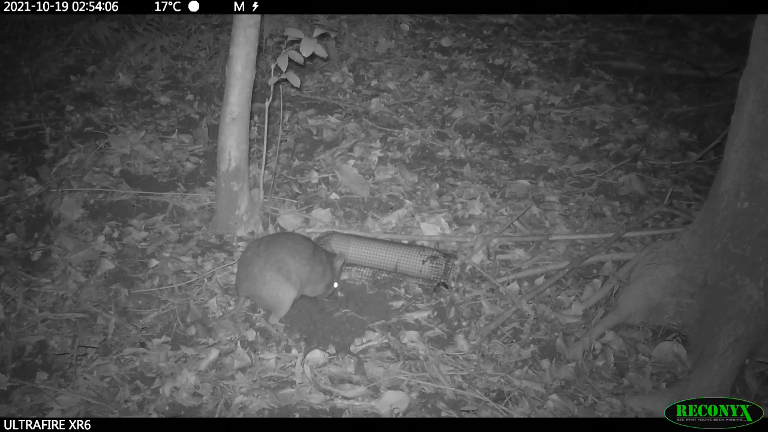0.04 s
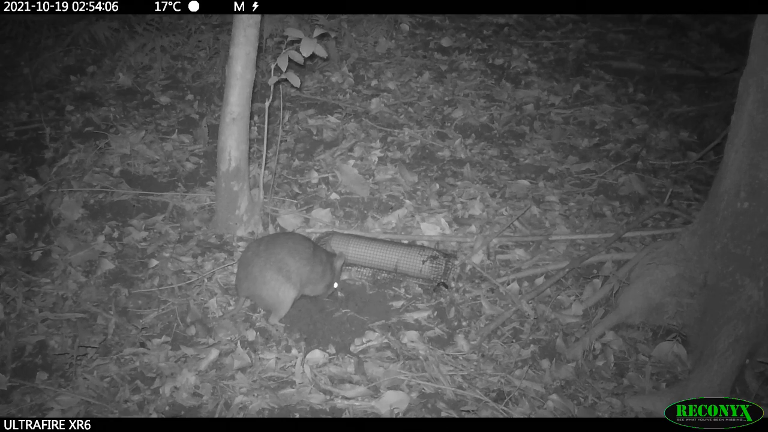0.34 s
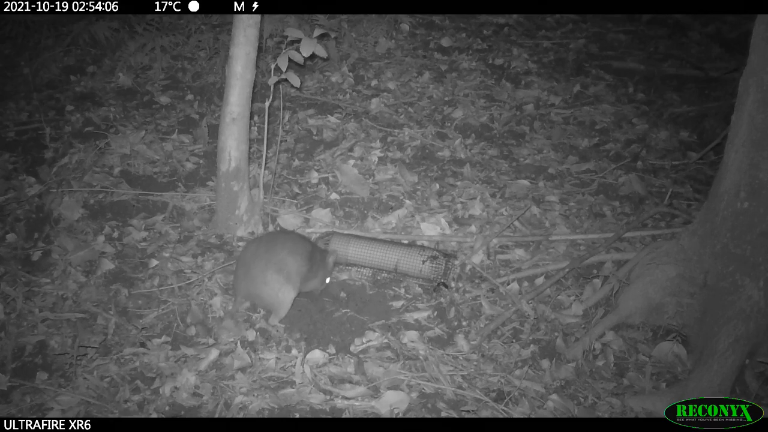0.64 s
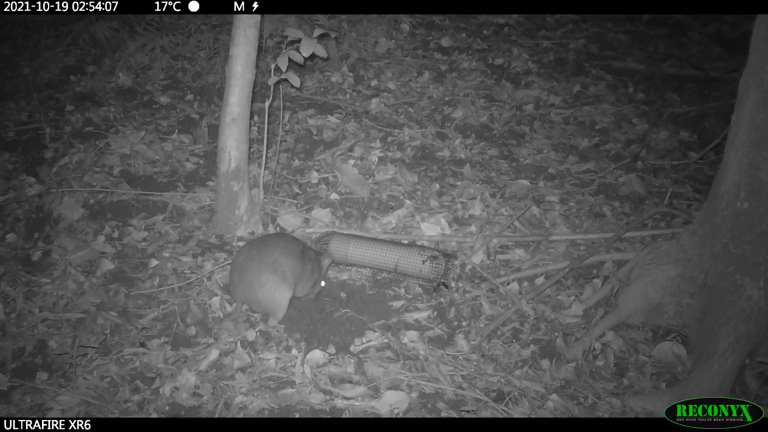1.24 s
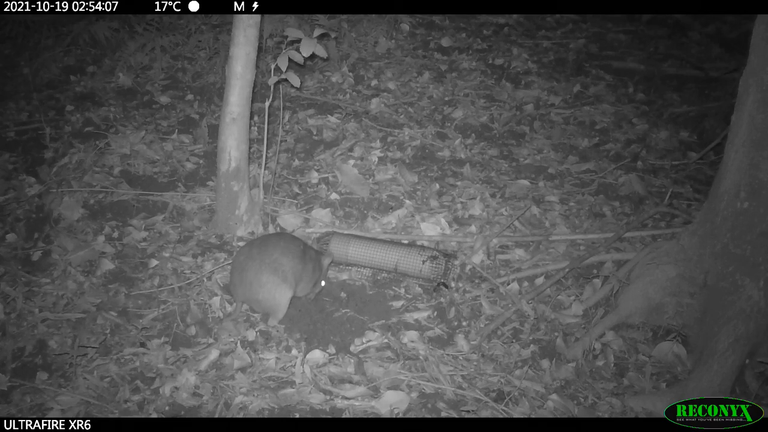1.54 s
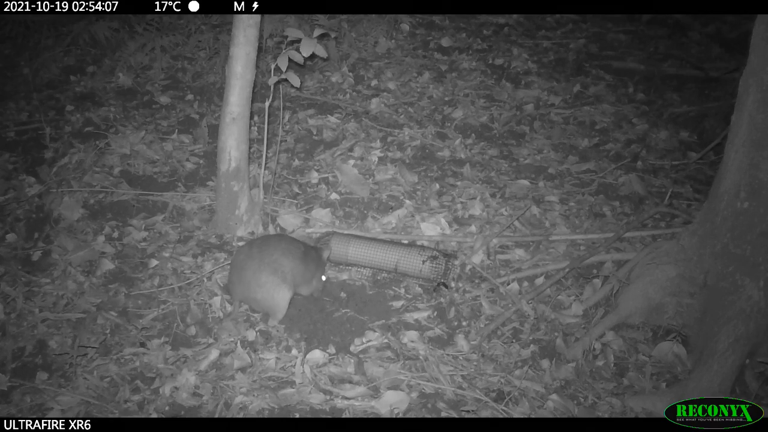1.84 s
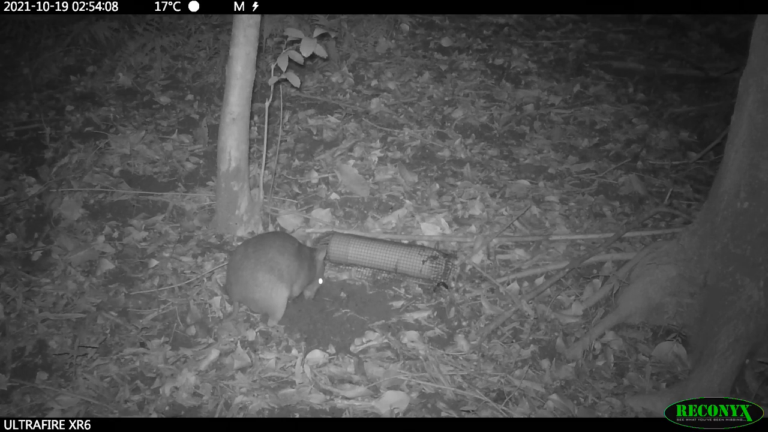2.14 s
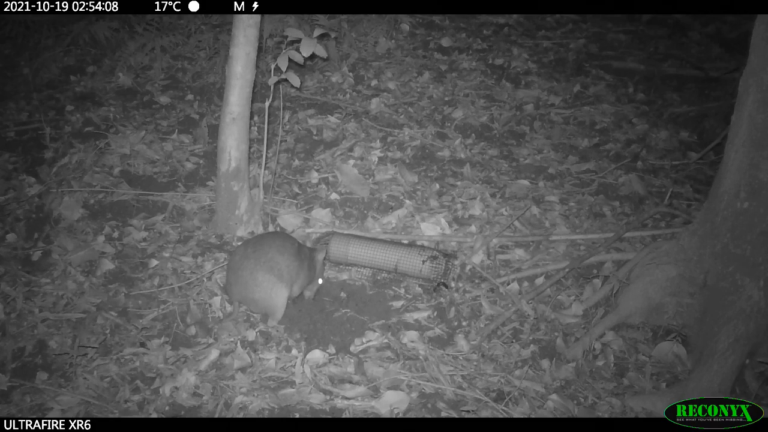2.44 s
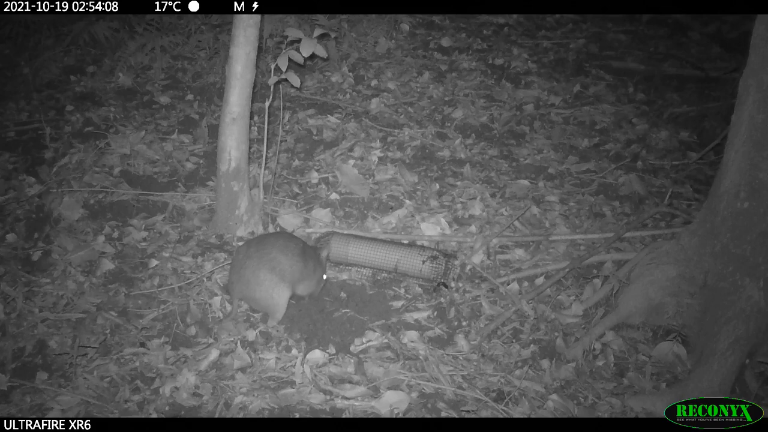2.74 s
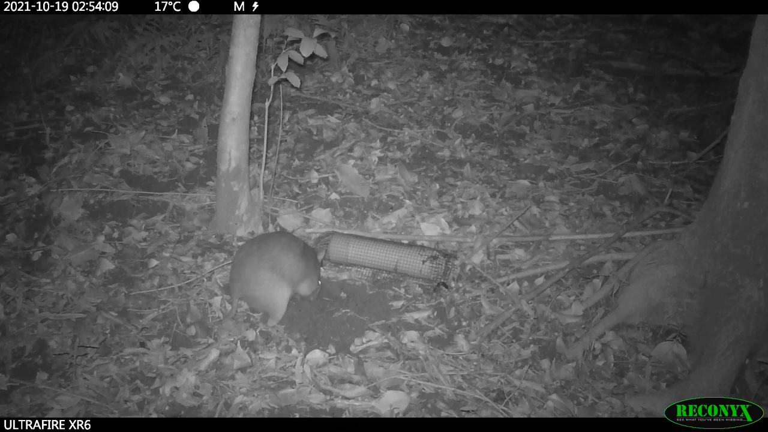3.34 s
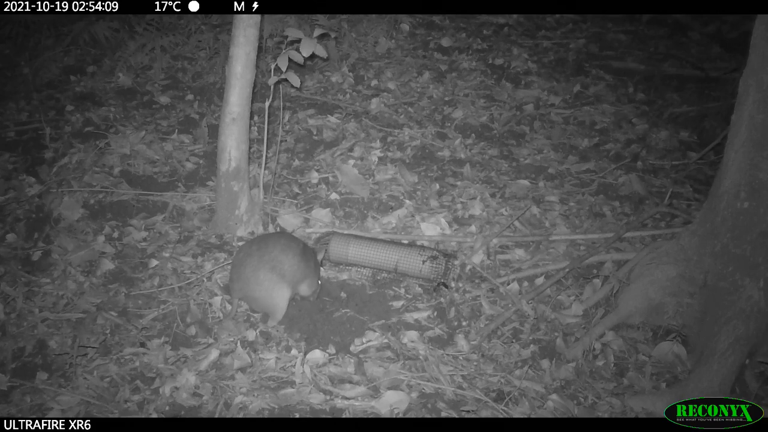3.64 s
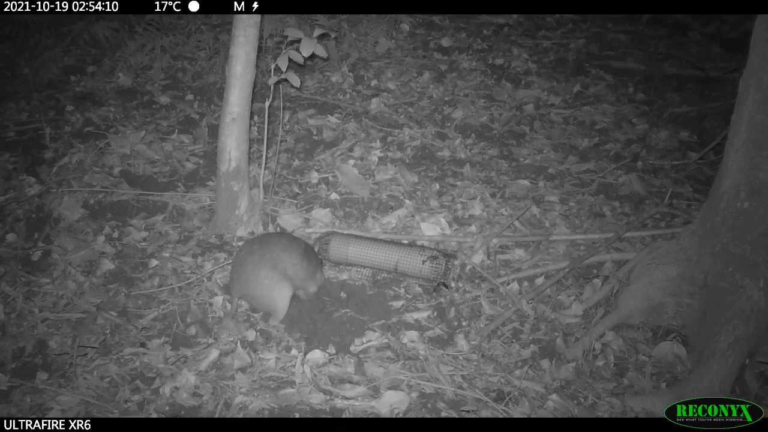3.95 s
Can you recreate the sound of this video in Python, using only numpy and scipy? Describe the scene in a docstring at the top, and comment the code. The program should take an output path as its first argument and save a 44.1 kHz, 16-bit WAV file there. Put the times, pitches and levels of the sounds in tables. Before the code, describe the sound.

Light digging and rustling in leaf litter by a small animal, amid thin night chirps.

```python
"""Thin, down-hooked chirps and very high bat-like sweeps scatter among the trunks of a forest at night.
A small animal rakes soil and dry leaves: one strong scrape, then light shuffles and twig ticks.
Each tiny fracture is an impulse that excites a damped resonance; the calls are gliding pure tones.
A closely spaced microphone pair hears the digging slightly from the left, over faint rumble and hiss."""
import sys
import numpy as np
from scipy import signal
from scipy.fft import rfft, irfft
from scipy.io import wavfile

SR = 44100
rng = np.random.default_rng(int(sys.argv[2]) if len(sys.argv) > 2 else 0)


def materialize(psi):
    """Save the field psi as 16-bit PCM at rate SR to the path in sys.argv[1].

    A 1-D psi becomes a single channel; in a 2-D psi each row is a channel.
    """
    bounded = np.clip(np.atleast_2d(psi).T, -1, 1)
    quanta = np.round(bounded * 32767).astype(np.int16)
    wavfile.write(sys.argv[1], SR, quanta)


N = 176400
TIME = np.arange(N) / SR

# Levels are relative within each table.
# force of the strong scrape: t/s, level/dB
SCRAPE_FORCE = [(.53, -62.5), (.622, -53.5), (0.631, -42.5), (.66, -46.5), (.70, -46), (.762, -43),
                (.775, -40), (.805, -43.5), (.835, -41.5), (.847, -43), (.856, -42), (.872, -43),
                (.91, -49), (1.0, -51), (1.06, -60), (1.14, -58.5), (1.25, -83)]
# light shuffles of the paws: centre t/s, 1/e half-width/s, level/dB
SHUFFLES = [(0.492, 0.026, -65), (1.38, 0.0086, -50), (1.42, .04, -63), (1.49, 0.043, -63),
            (1.852, 0.057, -58.5), (1.964, .06, -56.5), (2.083, 0.014, -62), (2.356, 0.034, -66),
            (2.694, 0.082, -59), (3.19, 0.052, -58), (3.29, 0.033, -60), (3.492, 0.023, -55),
            (3.57, 0.075, -63), (3.864, 0.047, -62.5), (3.982, 0.043, -61.5)]
# crumbling litter, coloured by the recorder housing's resonance near 6.6 kHz: f/Hz, level/dB
LITTER_AND_HOUSING = [(200, -23), (900, -23.5), (1500, -18), (3000, -18), (4200, -13), (5500, -5),
                      (6600, 4), (8000, -3), (10400, -15), (13500, -13), (15500, -26)]
# leaves torn by hard strokes: f/Hz, level/dB
TEARING_SPECTRUM = [(1000, -36), (2500, -19), (4500, -21), (7000, 10), (10000, 8), (15500, 0.5)]
# ground thudding under the paws: f/Hz, level/dB
THUD_SPECTRUM = [(20, -3), (55, 5.5), (90, -5), (160, -18), (400, -42), (1500, -51)]
# snapping twigs and leaf stalks: t/s, level/dB, f/Hz
SNAPS = [(.6285, -26, 6900), (.667, -31, 6500), (0.7524, -27, 7400), (0.7536, -20.5, 6800),
         (0.7757, -28, 7260), (0.8239, -32, 6460), (.841, -32, 6200), (.854, -23, 6240), (0.857, -35, 6070),
         (0.8903, -34, 7000), (0.923, -32.5, 7800), (0.9264, -32.5, 6430), (1.0694, -30, 6750),
         (1.21, -43, 6330), (1.3782, -37, 5100), (1.3816, -44, 5500), (2.059, -40.5, 6500),
         (2.074, -38.5, 6800), (2.623, -39.5, 7600), (2.7252, -36.5, 6700), (3.212, -34, 6840),
         (3.284, -35.5, 7100), (3.4491, -24.5, 7000), (3.4623, -33, 6600), (3.48, -33, 6300),
         (3.4892, -30.5, 7900), (3.498, -29.5, 6440), (3.568, -38, 6750), (3.574, -34, 7800)]
# loosened soil falling back: centre t/s, 1/e half-width/s, level/dB
SOIL_FALLS = [(0.79, 0.0091, -63), (0.848, .035, -55), (2.33, 0.034, -65), (3.08, 0.028, -66)]
# patter of that soil: f/Hz, level/dB
SOIL_SPECTRUM = [(300, -14), (1300, -12), (2700, 6), (4500, -4.5), (7000, -0.5), (15000, -20)]
# chirps: onset t/s, duration/s, f/Hz, final drop/Hz, level/dB
CHIRPS = [(0.0, 0.017, 8550, 200, -51.5), (.118, 0.057, 8120, 900, -42), (0.352, 0.028, 8055, 1000, -43),
          (.527, 0.036, 8300, 500, -53), (0.979, 0.043, 8040, 790, -42), (1.095, 0.034, 8460, 200, -53),
          (1.204, 0.023, 7600, 300, -57.5), (1.348, 0.029, 7400, 493, -45.5),
          (1.437, 0.036, 7750, 500, -52.5), (1.445, 0.05, 8500, 600, -50.5), (1.466, 0.045, 7535, 700, -42),
          (1.687, 0.018, 8310, 150, -44.5), (1.704, 0.031, 7890, 600, -45.5),
          (1.785, 0.031, 7260, 500, -50), (2.132, .05, 8170, 600, -61), (2.215, 0.021, 8670, 700, -53),
          (2.324, 0.039, 8340, 1310, -51), (2.481, 0.036, 8240, 600, -51.5), (2.525, 0.039, 7560, 300, -59),
          (2.734, 0.046, 8114, 710, -41), (3.009, 0.026, 8740, 400, -48.5), (3.062, 0.059, 8080, 930, -45),
          (3.148, 0.044, 8140, 500, -51), (3.167, 0.053, 7680, 990, -44.5), (3.27, 0.069, 8090, 600, -59.5),
          (3.354, 0.06, 8360, 410, -55), (3.453, 0.075, 8375, 600, -47), (3.642, 0.034, 7660, 600, -52),
          (3.67, 0.041, 7620, 710, -39.5), (3.729, 0.022, 8340, 100, -51)]
# high downward sweeps: onset t/s, level/dB
SWEEPS = [(0.012, -44), (.549, -43), (1.09, -43), (1.619, -38), (2.279, -43.5), (2.939, -41.5),
          (3.748, -44)]
# night air and microphone hiss, with a faint wash of distant chirps near 7.5 kHz: f/Hz, level/dB
BACKGROUND_SPECTRUM = [(20, -3.5), (40, -2), (62, -4.5), (100, -9), (200, -14), (500, -20.5), (1000, -24),
                       (2000, -27.5), (4000, -30), (5500, -30.5), (7500, -25.5), (9500, -32), (12500, -32),
                       (15500, -35.5)]
# left-right likeness of that noise: f/Hz, correlation
BACKGROUND_CORRELATION = [(30, 0.35), (500, 0.21), (2000, 0.39), (5000, 0.26), (12000, 0.3)]
# lead of the left microphone port at leftward = 1: f/Hz, phase/rad
PORT_PHASE = [(500, -0.5), (4200, 0.18), (5300, 1.28), (6400, 1.67), (8400, 1.78), (10700, 3), (15000, 2)]
# converter bias, left and right rows: offset/full scale
DC_OFFSET = [
    [-.0347],
    [-.0291],
]

GRAINS_PER_S = 5000


def digging(bands=16, ring_cycles=5.3):
    """Superposed fracture impulses, sliding soil and a low thud all scale with the paws' force."""
    times, levels = np.transpose(SCRAPE_FORCE)
    scrape = from_db(np.interp(TIME, times, levels)) * (TIME > times[0]) * (TIME < times[-1])
    force = scrape + swells(SHUFFLES)
    sizes = from_db(3 * np.minimum(rng.exponential(1, N), 3.2)) * rng.choice([-1, 1], N)
    clicks = sizes * (rng.random(N) < GRAINS_PER_S / SR)
    band = rng.integers(0, bands, N)
    grains = sum(np.sqrt(hz) * ring(clicks * (band == k), hz, ring_cycles / hz)
                 for k, hz in enumerate(np.geomspace(1000, 15000, bands)))
    sliding = from_db(-1) * colour(rng.standard_normal(N), LITTER_AND_HOUSING)
    litter = rms_one(colour(grains, LITTER_AND_HOUSING) + sliding)
    tear_gain = from_db(-2) * (force / force.max()) ** 0.58   # harder strokes are brighter
    tearing = tear_gain * colour(clicks * rng.choice([-1, 1], N), TEARING_SPECTRUM)
    thud = from_db(-13.5) * colour(rng.standard_normal(N), THUD_SPECTRUM)
    clumping = rms_one(from_db(2 * drift(144)))
    return force * ((litter + tearing) * clumping + thud)


def twig_snaps(t60=0.0034):
    """Free vibration: after a brief bright crack, a twig rings down in two damped modes."""
    out, t = np.zeros(N), TIME[:SR // 20]
    impulse = 1.0 * (t == 0)
    for onset, db, hz in SNAPS:
        bright_noise = np.diff(rng.standard_normal(len(t) + 1))
        crack = from_db(-12.5) * bright_noise * np.exp(-t / 0.0004)
        modes = ring(impulse, hz, t60) + from_db(-21) * ring(impulse, hz * 0.47, t60)
        add(out, onset, from_db(db) * (modes + crack))
    return out


def falling_soil():
    """Shot noise: thrown crumbs land at random instants and merge into a duller patter."""
    crumbs = rng.standard_normal(N) * (rng.random(N) < GRAINS_PER_S / SR)
    return swells(SOIL_FALLS) * colour(crumbs, SOIL_SPECTRUM)


def chirps(waver_rms_hz=69, rise_share=0.27, fall_share=0.17):
    """Frequency modulation: a thin whistle wavers about its pitch, then hooks downward as it fades."""
    out, waver = np.zeros(N), waver_rms_hz * drift(262)
    for onset, duration, hz, drop_hz, db in CHIRPS:
        progress = np.linspace(0, 1, int(duration * SR))
        pitch = hz - drop_hz * progress ** 5.52 + waver[int(onset * SR):][:len(progress)]
        envelope = np.clip(np.minimum(progress / rise_share, (1 - progress) / fall_share), 0, 1)
        add(out, onset, from_db(db) * np.sqrt(2) * envelope * tone(pitch))
    return out


def high_sweeps(top_hz=16140, floor_hz=10670, glide_s=0.0037, duration_s=0.013):
    """Exponential glide: a bat-like call dives from the edge of hearing and levels off."""
    out, t = np.zeros(N), TIME[:int(duration_s * SR)]
    pitch = floor_hz + (top_hz - floor_hz) * np.exp(-t / glide_s)
    envelope = np.minimum(t / 0.0021, 1) * (1 - t / duration_s) ** 1.17
    for onset, db in SWEEPS:
        add(out, onset, from_db(db) * envelope * tone(pitch))
    return out


def forest(x, leftward, direct_db, near_db, near_s, far_db, far_t60):
    """Scattering: echoes from ground and near trunks follow the direct sound, then a diffuse tail."""
    t = TIME[:SR]
    near = rng.standard_normal((2, SR)) * np.exp(-(t / near_s) ** 2) * np.minimum(t / (near_s * 0.11), 1)
    far = rng.standard_normal((2, SR)) * from_db(-60 * t / far_t60) * (1 - np.exp(-t / near_s))
    echoes = (from_db(near_db) * rms_one(near) + from_db(far_db) * rms_one(far)) / np.sqrt(SR)
    reverberation = signal.fftconvolve(x[None], echoes, axes=1)[:, :N]
    right = irfft(rfft(x) * np.exp(-1j * leftward * per_bin(PORT_PHASE)), N)
    return from_db(direct_db) * np.array([x, right]) + reverberation


def night_background():
    """Partial coherence: the microphones share some of the rumble, hiss and wash of distant chirps."""
    mid, side = rfft(rng.standard_normal((2, N)))
    correlation = per_bin(BACKGROUND_CORRELATION)
    pair = irfft(np.sqrt(1 + correlation) * mid + np.sqrt(1 - correlation) * side * [[1], [-1]], N)
    balance = from_db([[-0.7], [0.7]])
    return from_db(-52.5) * colour(pair, BACKGROUND_SPECTRUM) * balance


def ring(x, hz, t60):
    """Damped resonator: a unit impulse rings with an amplitude of about 1."""
    r, w = from_db(-60 / (t60 * SR)), 2 * np.pi * hz / SR
    return signal.lfilter([.5, 0, -.5], [1, -2 * r * np.cos(w), r * r], x + 1e-18)


def tone(hz):
    """Phase is the time integral of frequency."""
    return np.sin(2 * np.pi * np.cumsum(hz) / SR)


def swells(rows):
    """A sum of Gaussian envelopes."""
    return sum(from_db(db) * np.exp(-((TIME - centre) / half) ** 2) for centre, half, db in rows)


def drift(corner_hz):
    """Low-pass noise: a smooth random fluctuation of unit rms."""
    r = np.exp(-2 * np.pi * corner_hz / SR)
    return rms_one(signal.lfilter([1], [1, -2 * r, r * r], rng.standard_normal(N + SR))[SR:])


def colour(x, spectrum):
    """Zero-phase filtering, scaled to unit rms."""
    return rms_one(irfft(rfft(x) * from_db(per_bin(spectrum)), N))


def per_bin(points):
    """Log-frequency interpolation of a table at every spectral bin."""
    hz, value = np.transpose(points)
    return np.interp(np.log(np.fft.rfftfreq(N, 1 / SR) + 1), np.log(hz), value)


def from_db(db):
    """Level to amplitude ratio."""
    return 10 ** (np.asarray(db) / 20)


def rms_one(x):
    """Normalisation to unit rms."""
    return x / np.sqrt(np.mean(x ** 2) + 1e-20)


def add(out, onset, sound):
    """Superposition of a delayed sound."""
    i = int(onset * SR)
    out[i:i + len(sound)] += sound[:N - i]


def scene():
    """The direct-to-reverberant ratio conveys distance: digging and twigs close, callers farther off."""
    ground = forest(digging() + falling_soil(), leftward=0.89, direct_db=1.5,
                    near_db=-8.5, near_s=0.017, far_db=-15, far_t60=0.92)
    twigs = forest(twig_snaps(), leftward=0.54, direct_db=1.5,
                   near_db=-6.5, near_s=0.013, far_db=-14, far_t60=0.5)
    whistles = forest(chirps(), leftward=0.6, direct_db=-4.5,
                      near_db=-1.5, near_s=0.041, far_db=-6, far_t60=0.4)
    high_calls = forest(high_sweeps(), leftward=0.5, direct_db=-4,
                        near_db=9.5, near_s=0.042, far_db=6.5, far_t60=0.39)
    return ground + twigs + whistles + high_calls + night_background()


def record(dry, cutoff_hz=15600):
    """Band limiting: a steep low-pass cuts the top; the converter adds a constant offset."""
    lowpass = signal.ellip(10, 0.2, 70, cutoff_hz, fs=SR, output="sos")
    return signal.sosfilt(lowpass, dry) + DC_OFFSET


dry = scene()
out = record(dry)
materialize(out)
```